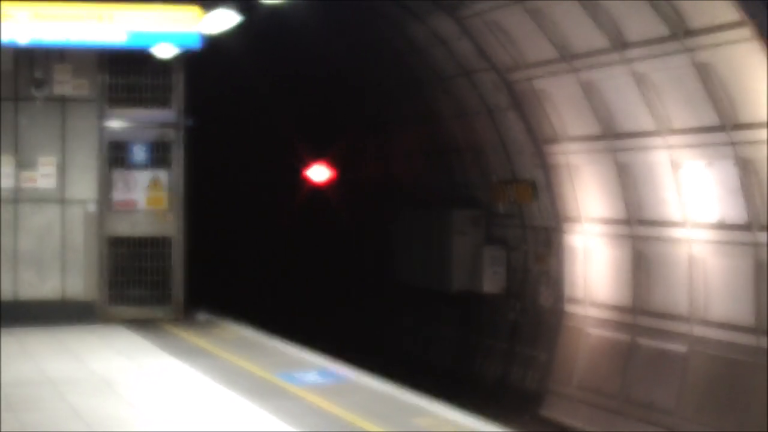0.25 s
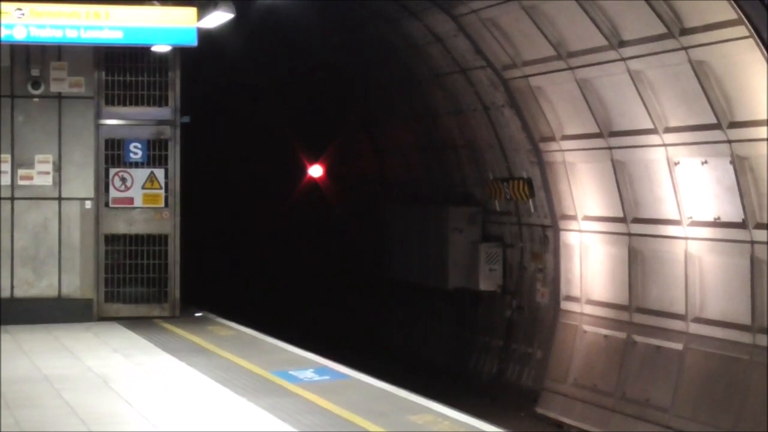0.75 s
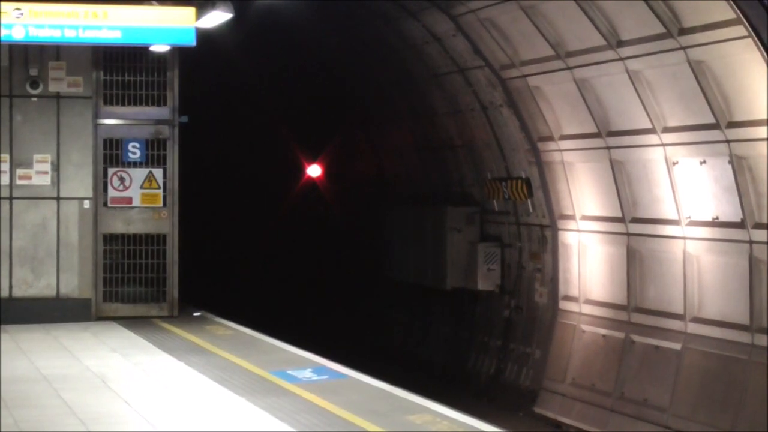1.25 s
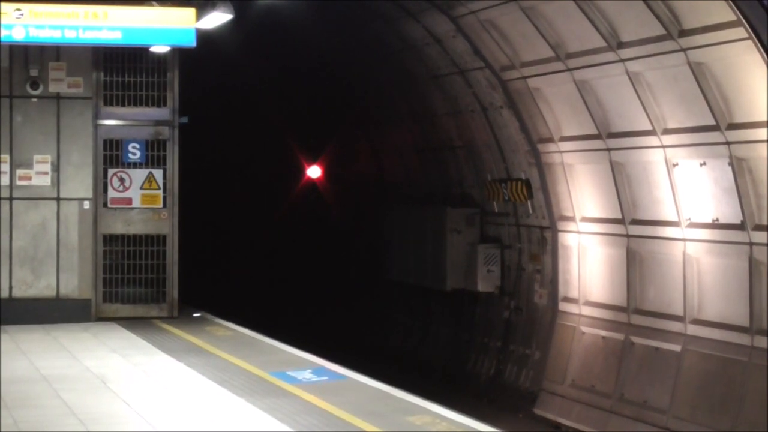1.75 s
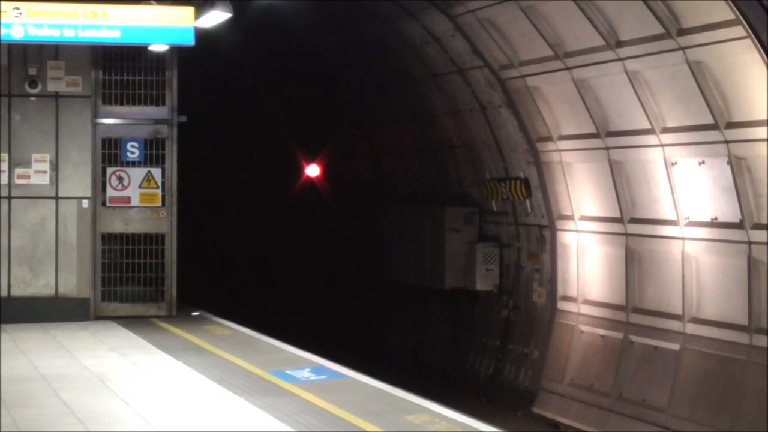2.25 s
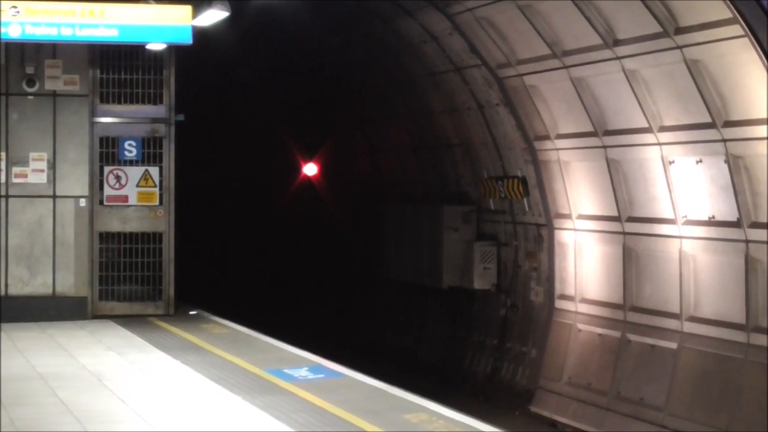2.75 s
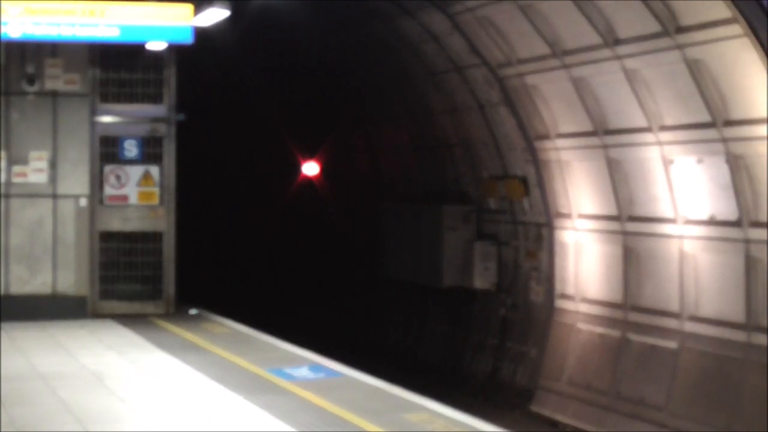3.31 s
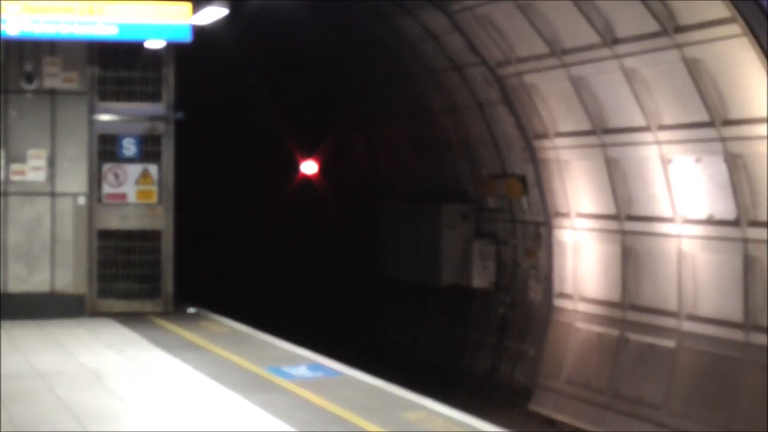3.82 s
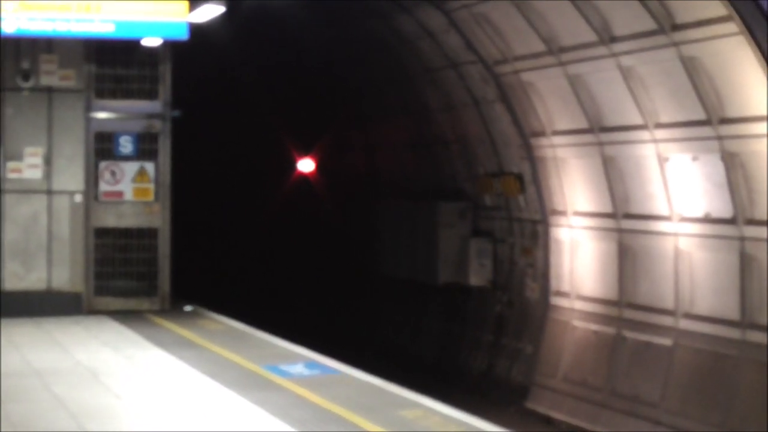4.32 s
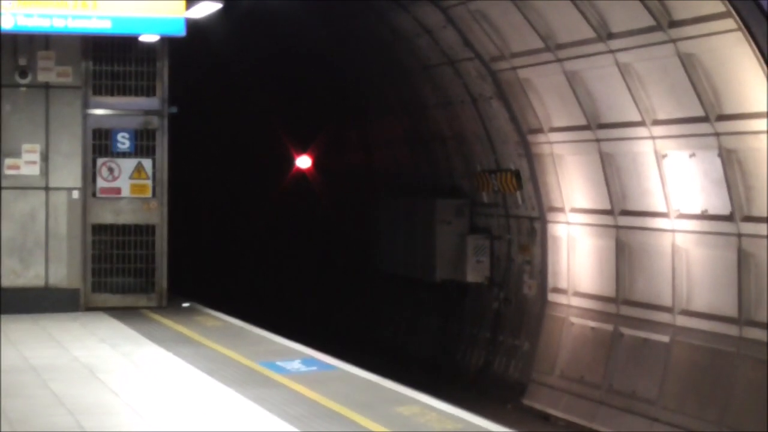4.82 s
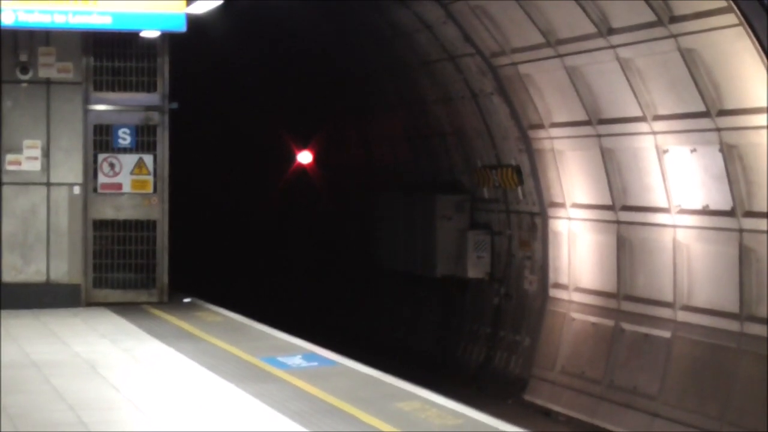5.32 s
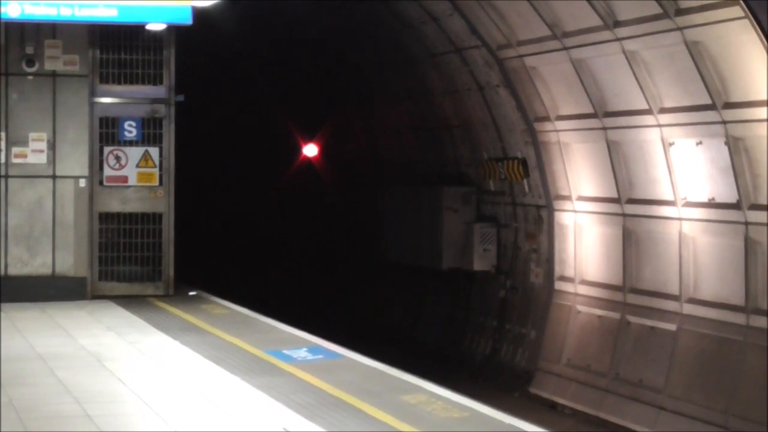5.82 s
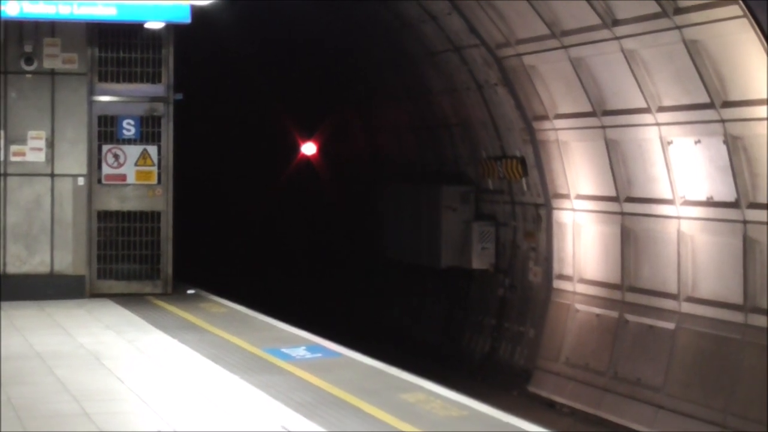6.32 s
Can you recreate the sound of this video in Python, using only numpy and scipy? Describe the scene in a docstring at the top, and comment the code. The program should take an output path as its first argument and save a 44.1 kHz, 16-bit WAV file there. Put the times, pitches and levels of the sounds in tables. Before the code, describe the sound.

Hollow tunnel drone with soft draught buffeting, brief irregular focus clicks at the start, and a fast, faint mechanical purr in the second half.

```python
"""An empty underground platform: a resonant tunnel rumble throughout, with a small camera's faint hiss and buzz.
At first the focus motor hunts in uneven ticks while draught thumps on the two microphone ports, mostly the right.
Thumps return before two seconds, then the draught eases. Near three seconds the motor starts creeping at fifty
ticks a second, and gusts crowd in again from about four. Shaped noise makes the air and hiss, wandering
oscillations the gusts, decaying body modes the ticks."""
import sys
import numpy as np
from scipy import signal
from scipy.io import wavfile
from scipy.ndimage import uniform_filter1d

SR = 44100
rng = np.random.default_rng(int(sys.argv[2]) if len(sys.argv) > 2 else 0)


def to_wav(sig):
    """Store sig (one row per channel, or 1-D mono) as 16-bit WAV at the path in sys.argv[1].

    Samples outside -1..1 are clipped; the rate is SR.
    """
    pcm = np.clip(np.atleast_2d(sig), -1, 1) * 32767
    pcm = np.round(pcm).astype(np.int16)
    wavfile.write(sys.argv[1], SR, pcm.T)  # frames by channels


N = 289296

# Broad tunnel colour. Each row: frequency in Hz, relative level in dB per Hz.
RUMBLE_COLOUR = [(30, -31), (100, -8.5), (190, -1.5), (260, 3.5), (320, -6), (600, -4.5), (900, -5.5),
                 (1000, -12), (1150, -31), (1340, -44), (1400, -27.5), (1800, -33), (1900, -43.5),
                 (2600, -61.5)]
# Tunnel resonances over that colour. Each row: centre in Hz, width in Hz, level in dB rms.
RESONANCES = [(209, 12, -42), (239, 47, -41.5), (364.2, 12, -39), (335.7, 13.5, -44.5), (630, 7.4, -41.5),
              (663.4, 29, -42.5), (716, 14, -53), (798, 5, -50.5), (837, 11.3, -44), (884, 34, -44.5),
              (970, 9.7, -53), (1113, 10, -76.5), (1430, 50, -65), (1572, 23, -65.5), (1607, 40, -67.5),
              (1760, 16, -70), (2016, 19, -77.5)]
RUMBLE_DB = -31.5  # rms of the broad colour, without the resonances
# Slow swell of the rumble, used about its mean. Each row: time in seconds, level in dB.
SWELL_CURVE = [(0, 1), (1, 1), (2, 1.37), (3.2, 2.17), (4.2, 1), (5.2, 1.95), (6.56, 1.04)]
# Left-right likeness of the rumble. Each row: frequency in Hz, correlation from -1 to 1.
RUMBLE_LIKENESS = [(100, 0.97), (350, 0.992), (700, 0.975), (1100, 0.96), (1500, 0.91), (2200, 0.94),
                   (3000, 0.94)]
# Wide wash of tunnel colour. Each row: time in seconds, level on the left port in dB rms.
RUSH_CURVE = [(0, -44), (.5, -41), (.85, -47), (1.1, -42.5), (1.6, -46), (2, -58), (2.6, -55), (3.1, -45),
              (3.4, -41), (3.75, -40), (4.1, -37), (4.3, -34.5), (4.6, -45.5), (5.1, -38), (5.4, -41.5),
              (5.9, -36), (6.1, -37.5), (6.56, -38.5)]

# Draught on each port, before crossfeed. Each row: time in seconds, left and right low flutter in dB rms.
DRAUGHT_CURVE = [(0.0, -73, -40), (0.22, -42, -49), (0.36, -36, -34), (0.48, -51, -44.5), (0.602, -34, -31),
                 (0.75, -46.5, -40), (1.1, -41, -40.5), (1.38, -39, -35), (1.56, -41, -38),
                 (1.95, -37.5, -38), (2.18, -55, -49), (2.6, -69, -56), (3.0, -47.5, -53), (3.5, -50, -44),
                 (4.0, -46.5, -48), (4.35, -39, -40.5), (4.75, -43.5, -40), (4.95, -45, -40.5),
                 (5.2, -47, -42), (5.5, -37.5, -36), (6.0, -44.5, -42), (6.48, -38.5, -37),
                 (6.56, -65, -40)]
# Draught colour. Each row: frequency in Hz, relative dB per Hz in calm air, dB gained per dB of draught.
FLUTTER_COLOUR = [(15, -50, 7), (47.8, -6, 0), (83, 3.5, 1), (135, 0.5, 2.5), (236, 0, 2), (290, -10.5, 2),
                  (477, -22.5, 4.5), (870, -17.5, 1.5), (1170, -56, 5.5), (1790, -65.5, 1.5)]
# Strong gusts, before filtering. Each row: crest in seconds, eddies in dB rms on the nearer port,
# left-right balance in dB, length in ms, eddy rate in Hz, fine scrape in dB rms.
STRONG_GUSTS = [(0.3316, -3.5, -13.5, 5.5, 212, -52), (0.3736, -12, -8, 12, 212, -41),
                (0.385, -28, -6, 13, 192, -36), (0.5841, -18, 13, 7.2, 200, -56),
                (0.5925, -16, -12, 7, 220, -50), (0.5992, -4.5, 14, 7.5, 200, -40),
                (0.6069, -9, 1.5, 6, 190, -45), (0.612, -4.2, -30, 4.9, 286, -35.5),
                (0.6208, -4, -25.5, 6.4, 170, -36.5), (0.6282, -11.5, -25, 12, 290, -39.5),
                (0.6915, -12, -16, 7.3, 216, -58), (0.6995, -17, -17, 11, 242, -59),
                (1.2614, -19, -17, 5.4, 197, -65), (1.2749, -13, -5.5, 8.1, 229, -56),
                (1.2996, -22, 0, 6.5, 200, -65), (1.3363, -10.5, 9, 12, 257, -67),
                (1.3532, -14, -12, 8.1, 247, -44), (1.3628, -14.5, -25, 13, 258, -49),
                (1.3926, -4.5, -10, 4.1, 190, -46), (1.408, -11.5, -21, 6.8, 237, -48),
                (1.4435, -10.5, -17, 4.7, 200, -48), (1.6505, -11, -23, 6.4, 169, -65),
                (1.6668, -4.5, -20, 3.9, 295, -54), (1.6768, -2, -16, 3, 295, -55),
                (1.6854, -16.5, -16, 20, 264, -58), (1.7029, -14.5, -6.5, 21, 282, -49),
                (1.7644, -18, -21, 8.5, 170, -65), (1.97, -17.5, -35, 19, 151, -65),
                (3.4324, -18.5, 35, 18, 237, -65), (3.573, -16, -9, 5.1, 173, -64),
                (4.213, -25, -12, 22, 130, -49), (4.3085, -14, -2, 11, 150, -57),
                (4.3155, -19, -13, 6.6, 210, -58), (4.33, -15, -20, 19, 164, -60),
                (4.3541, -8, -6, 6.5, 182, -50), (4.383, -23, -16, 18, 246, -52),
                (4.5033, -14, -32, 14.4, 192, -65), (4.5105, -15, -3.5, 16, 168, -65),
                (4.53, -21, 21, 17, 87.5, -65), (4.6036, -13, -29, 7.6, 133, -50),
                (4.9032, -7.5, -28, 4.2, 234, -65), (4.9113, -11, -25, 5.8, 250, -58),
                (4.9175, -18, -20, 6, 308, -58), (4.9396, -15.5, -15, 7.8, 172, -67),
                (4.9648, -10, -13, 5.4, 198, -60), (4.982, -10, -8, 8, 230, -56),
                (4.9924, -3, -14, 7.9, 169, -35), (4.9989, -4, -14, 3.5, 230, -30),
                (5.0075, -7, -7, 4.6, 241, -53), (5.0215, -18, -15, 6.3, 250, -50),
                (5.0264, -13, -22, 2.3, 272, -38), (5.0302, -13, -12, 3.3, 290, -47),
                (5.4978, -10, -8, 8.3, 229, -53), (5.6076, -16, -5, 6, 200, -65),
                (6.0828, -21, 14, 12, 207, -65), (6.3503, -15, -1.5, 7.4, 178, -51),
                (6.483, -11, -4, 10, 162, -58), (6.5001, -15.5, -12, 6.7, 170, -49),
                (6.5153, -17, -10, 14, 196, -63), (6.542, -17, 8.5, 21, 166, -64),
                (6.5522, -15, -18, 29, 180, -38)]
# Small gusts: the stronger the draught, the louder.
SMALL_PER_S = 9
SMALL_OVER_DB, SMALL_SPREAD_DB = 9, 5.5  # above the draught's low flutter
SMALL_PAN_DB, SMALL_PAN_SPREAD_DB = -15, 11  # left minus right
SMALL_MS, SMALL_HZ, SMALL_SCRAPE_DB = 20, 178.7, -61.5
# Low push of air: dB rms for a 0 dB gust of 20 ms, dB per dB of gust, dB per doubling of length.
PUSH_DB, PUSH_GROWTH, PUSH_PER_DOUBLING_DB = -14, 0.56, 7.5
# Dry ticks on strong gusts. Each row: time in seconds, peak on the right port in dB, width in ms.
CREST_TICKS = [(0.6107, -38, 0.23), (0.6245, -36, 0.44), (1.3615, -41, 0.31), (1.6768, -25, 0.33),
               (4.999, -23.5, 0.51)]

# Focus motor hunting. Each row: step time in seconds, then accents of low knock, ping and upper clatter in dB.
HUNT_STEPS = [(.04, 7, 0, 12), (.06, -7, 14, 0), (.08, 2, 3, 3), (.10, -3, 8, 3), (.14, 5, 5, 1),
              (.16, -4, 8, 6), (.18, -2, 6, 1), (.20, -4, 12, 4), (.24, 0, 4, 0), (.26, 4, -4, 5),
              (.28, 2, -4, 0), (.30, 1, -4, 3), (.32, 4, -4, 1), (.34, -2, 12, 5), (.36, -4, 4, 5),
              (.38, -8, -4, -9), (.40, -2, 5, 7), (.42, 2, 3, 2), (.44, -4, 9, 5), (.46, -5, 0, 1),
              (.48, -2, 10, 2), (.50, -3, -5, -3), (.54, 0, 0, -3), (.56, -7, -5, -6), (.62, -2, 3, 2.5),
              (.64, -1, -6, -2), (.66, 0, -4, -2), (.70, 1, 2, -1)]
# Focus motor creeping steadily. The row: first step in seconds, last step in seconds.
CREEP_SPAN = (2.94, 6.54)
STEP_S = .02  # motor clock period
HUNT_SPREAD_DB = 4  # scales the random unevenness of hunting steps
KNOCK_TOP_HZ, PING_TOP_HZ = 3200, 4300  # modes are knock, ping or clatter by frequency
# Hard and soft creeping steps alternate; their order swaps over once.
ALTERNATE_DB, SWAP_S, SWAP_TAKES_S = 0.8, 5.4, 0.34
# Camera body modes. Each row: frequency in Hz, strike level in dB before the soft onset, 60 dB decay in seconds,
# random spread in dB, left-right balance in dB, rebound delay in ms, rebound level in dB, left phase lead in radians.
BODY_MODES = [(2360, -44.5, 0.0077, 2.5, -3.5, 6.9, -10, 0.74), (3900, -65, 0.024, 4, -1, 3.1, -7.5, 1.5),
              (4820, -51.5, 0.0042, 0, -1, 2.7, 1.5, -1.9), (2640, -54.5, 0.0086, 2.5, 0.5, 1.64, -1, 0.4),
              (5230, -53, 0.0064, 0.6, 4, 3.5, -9, 2), (7100, -66, 0.0063, 8, -3, 3, -14, -1.5),
              (11000, -56.5, 0.0028, 2, -5, 3, -14, 0.5), (3760, -66, 0.0052, 4.5, 14.5, 1.426, 3, -1.5)]

# Hiss colour. Each row: frequency in Hz, relative level in dB per Hz, left-right balance in dB.
HISS_COLOUR = [(1480, 7, -5.5), (2900, -4, 0), (4700, -2.5, 1), (5930, -13.5, -2), (7470, -0.5, 1),
               (10100, 0.5, -1), (13900, 1.5, 6), (15200, -9, 12), (16000, 2.5, -4)]
HISS_DB = -61  # rms before the buzz and treble throb
# Left-right likeness of the hiss. Each row: frequency in Hz, correlation from -1 to 1.
HISS_LIKENESS = [(3000, 0.92), (3800, 0.58), (5500, 0.5), (6500, 0.1), (7900, -0.35), (10000, 0),
                 (13200, -0.3)]
EDGE_HZ = 15650  # top of the camera's band


def gain_of(db):
    """Turns dB into an amplitude factor."""
    return 10 ** (np.asarray(db) / 20)


def evened(x):
    """Scales a signal to rms 1."""
    return x / np.sqrt(np.mean(x ** 2) + 1e-20)


def read(points, hz, column=1):
    """Reads a table column at any frequency, interpolating on a log-frequency axis."""
    rows = np.transpose(points)
    return np.interp(np.log(hz + 1), np.log(rows[0] + 1), rows[column])


def grid(size):
    """Gives the frequencies, frame times and two complex noise fields of a short-time spectrum."""
    frames = 4 * N // size + 5
    a, b, c, d = rng.standard_normal((frames, size // 2 + 1, 4)).T
    hz = np.fft.rfftfreq(size, 1 / SR)
    frame_s = np.arange(frames) * size / 4 / SR
    return hz, frame_s, a + 1j * b, c + 1j * d


def sound_of(spectra, size):
    """Overlaps short-time spectra back into sound."""
    return signal.istft(spectra, nperseg=size, noverlap=3 * size // 4)[1][..., :N]


def filtered(x, order, hz, kind="low"):
    """Runs a Butterworth filter forward and back, so nothing shifts in time."""
    return signal.sosfiltfilt(signal.butter(order, hz, kind, fs=SR, output="sos"), x)


def hiss(throb_db=3.5, throb_from_hz=7000, spike_db=-57):
    """Circuit noise: its treble rises early in each motor-clock period, and a repeated slice of it buzzes."""
    size = 1024
    hz, _, a, b = grid(size)
    same = read(HISS_LIKENESS, hz)[:, None]
    tilt_db = read(HISS_COLOUR, hz, column=2) / 2
    colour = gain_of(read(HISS_COLOUR, hz) + [tilt_db, -tilt_db])[..., None]
    spectra = np.array([a, same * a + np.sqrt(1 - same ** 2) * b]) * colour
    noise = gain_of(HISS_DB) * evened(sound_of(spectra, size))

    period = round(STEP_S * SR)
    one_period = noise[:, SR:SR + period]
    noise = noise + .4 * np.tile(one_period, N // period + 1)[:, :N]

    treble = filtered(noise, 1, throb_from_hz, "high")
    since_clock = np.arange(N) % period
    busy = uniform_filter1d((since_clock < .55 * period) - .5, 40)
    throb = gain_of(throb_db * busy * np.array([[1], [.7]])) - 1

    # a short high spike marks the start of each period, stronger on the left
    u = since_clock / SR
    spike = gain_of(spike_db) * np.sin(2 * np.pi * 13200 * u) * np.exp(-u / 0.00043) * np.array([[1], [.5]])
    return noise + treble * throb + spike


def tunnel_power(hz):
    """Power of the tunnel in each frequency bin: a broad colour plus bell-shaped resonances."""
    power = gain_of(read(RUMBLE_COLOUR, hz)) ** 2
    power = power / power.sum() * gain_of(RUMBLE_DB) ** 2
    for centre_hz, width_hz, db in RESONANCES:
        peak = np.exp(-.5 * ((hz - centre_hz) / (width_hz / 2)) ** 2)
        power = power + peak / peak.sum() * gain_of(db) ** 2
    return power


def rumble(waver_db=-0.54):
    """Far trains and fans through the tunnel: coloured noise with narrow resonances, nearly mono."""
    size = 8192
    hz, frame_s, a, b = grid(size)
    power = tunnel_power(hz)
    same = np.clip(read(RUMBLE_LIKENESS, hz), -1, 1)[:, None]
    spectra = np.array([a, same * a + np.sqrt(1 - same ** 2) * b]) * np.sqrt(power)[:, None]

    # narrow patches wax and wane over a third of a second
    patches = rng.standard_normal((len(frame_s), len(hz))).T
    patches = uniform_filter1d(patches, size=7, axis=1)
    patches = uniform_filter1d(patches, size=8, axis=0)
    spectra *= gain_of(waver_db * evened(patches))

    s, swell_db = np.transpose(SWELL_CURVE)
    swell = gain_of(np.interp(np.arange(N) / SR, s, swell_db - swell_db.mean()))
    left_right = gain_of([[.3], [-.3]])
    return evened(sound_of(spectra, size)) * np.sqrt(power.sum()) * swell * left_right


def rush(from_hz=420, tilt_db=0.5, right_db=-9, right_tilt_db=3.5):
    """Tunnel-coloured noise, independent on each port and stronger on the left: it widens the rumble as it grows."""
    size = 4096
    hz, _, a, b = grid(size)
    octaves = np.log2((hz + 1) / 700)  # tilts are per octave about 700 Hz
    low_cut = 1 + (from_hz / (hz + 1)) ** 2
    colour = np.sqrt(tunnel_power(hz)) * gain_of(tilt_db * octaves) / low_cut
    right_colour = colour * gain_of(right_db + right_tilt_db * octaves)
    air = sound_of(np.array([a, b]) * np.array([colour, right_colour])[..., None], size)
    s, db = np.transpose(RUSH_CURVE)
    level = gain_of(np.interp(np.arange(N) / SR, s, db))
    return air / np.sqrt(np.mean(air[0] ** 2)) * level


def focus(lag_s=.0017, rise_cycles=2.2, rasp_db=-65, rasp_s=0.0034, whirr_db=-9, whirr_s=0.17,
          drift_rad=0.77, odd_rad=0.67, loose_rad=0.2):
    """Every motor step rings the camera body's modes, a little differently each time, and scrapes briefly."""
    hunt = np.array(HUNT_STEPS)
    hunts = len(hunt)
    mode_hz = np.transpose(BODY_MODES)[0]
    accent_column = 1 + np.searchsorted([KNOCK_TOP_HZ, PING_TOP_HZ], mode_hz)
    creep_s = np.arange(CREEP_SPAN[0], CREEP_SPAN[1] + STEP_S / 2, STEP_S)
    # steps follow the motor clock
    clock = np.round(np.concatenate([hunt[:, 0], creep_s]) / STEP_S)
    at = np.round((clock * STEP_S + lag_s) * SR).astype(int)

    accent_db = np.zeros((len(BODY_MODES), len(at)))
    uneven = rng.uniform(-0.61, 1, (hunts, len(BODY_MODES))).T
    accent_db[:, :hunts] = hunt[:, accent_column].T + HUNT_SPREAD_DB * uneven
    swap = np.tanh((creep_s - SWAP_S) / SWAP_TAKES_S)
    accent_db[:, hunts:] = ALTERNATE_DB * (-1) ** np.round(creep_s / STEP_S) * swap

    chance = np.clip(rng.standard_normal((len(at), len(BODY_MODES), 2)), -1.6, 1.6)
    # the ringing phase drifts from step to step, and odd steps are offset
    step_rad = drift_rad * np.cumsum(rng.standard_normal(len(at))) + odd_rad * (clock % 2)
    t, out = np.arange(1500) / SR, np.zeros((2, N))
    for k, mode in enumerate(BODY_MODES):
        hz, db, t60, spread_db, pan_db, rebound_ms, rebound_db, lead_rad = mode
        strength = gain_of(db + accent_db[k] + spread_db * chance[:, k, 0])
        strikes = np.zeros(N, complex)
        strikes[at] = strength * np.exp(1j * (loose_rad * chance[:, k, 1] + step_rad))
        strikes += gain_of(rebound_db) * np.roll(strikes, round(rebound_ms / 1000 * SR))
        onset = 1 - np.exp(-t * hz / rise_cycles)
        ring = gain_of(-60 * t / t60) * onset * np.exp(2j * np.pi * hz * t)
        ringing = signal.oaconvolve(strikes, ring)[:N]
        lead = np.exp([[.5j * lead_rad], [-.5j * lead_rad]])
        out += gain_of([[pan_db / 2], [-pan_db / 2]]) * (lead * ringing).real

    # a dry puff of noise on each step, with a fainter, longer whirr after it
    puffs = np.zeros(N)
    puffs[at] = gain_of(rasp_db + .5 * (accent_db[1] + accent_db[2]).clip(-6, 8))
    decay = np.exp(-t / rasp_s) + gain_of(whirr_db) * np.exp(-t / whirr_s)
    rasp = signal.oaconvolve(puffs, decay)[:N] * rng.standard_normal(N)
    rasp = signal.sosfilt(signal.butter(2, [2100, 6500], "band", fs=SR, output="sos"), rasp)
    return out + rasp * gain_of([[-1.], [1.]])


def draught(lumpy_db=1.0, crossfeed=0.096, calm_db=-42):
    """Separate turbulence on each port, changing colour as it grows; each feeds the other side inverted."""
    size = 2048
    hz, frame_s, a, b = grid(size)
    s, *port_db = np.transpose(DRAUGHT_CURVE)
    low = (hz > 25) & (hz < 110)  # the band whose level the curve sets
    colour = gain_of(read(FLUTTER_COLOUR, hz))
    growth = read(FLUTTER_COLOUR, hz, column=2)[:, None] - 1
    ports = []
    for noise, db in zip((a, b), port_db):
        level_db = np.interp(frame_s, s, db) + lumpy_db * rng.standard_normal(len(frame_s))
        growth_db = growth * (level_db - calm_db)
        low_rms = np.sqrt(np.mean(sound_of(noise * (colour * low)[:, None], size) ** 2))
        ports.append(sound_of(noise * colour[:, None] * gain_of(level_db + growth_db), size) / low_rms)
    return np.array(ports) - crossfeed * np.array(ports[::-1])


def small_gusts():
    """Lesser puffs in the same columns as the strong gusts, one at a random moment in each time slot."""
    slots = np.arange(round(SMALL_PER_S * N / SR))
    when, strength, side, length, rate = rng.standard_normal((len(slots), 5)).T
    s = np.clip((slots + .5 + .5 * np.tanh(when)) / SMALL_PER_S, 0, N / SR)
    curve_s, left_db, right_db = np.transpose(DRAUGHT_CURVE)
    draught_db = np.interp(s, curve_s, np.maximum(left_db, right_db))
    db = draught_db + SMALL_OVER_DB + SMALL_SPREAD_DB * np.tanh(strength)
    pan_db = SMALL_PAN_DB + SMALL_PAN_SPREAD_DB * side
    ms = SMALL_MS * np.exp(0.25 * length)
    hz = SMALL_HZ * np.exp(0.1 * rate)
    return list(zip(s, db, pan_db, ms, hz, np.full(len(s), SMALL_SCRAPE_DB)))


def gusts(wander=0.23, rough=0.17, attack=1.0, push_ms=30, push_hz=70, top_hz=750, low_hz=45):
    """Each gust sheds uneven eddies past one port over a slower push of air, inverted on the other side."""
    out, scrape = np.zeros((2, 2, N + SR))
    t = np.arange(-4096, 4096) / SR
    rows = STRONG_GUSTS + small_gusts()
    noise = rng.standard_normal((len(rows), 4, len(t)))
    start = rng.random(len(rows))
    rough_band = signal.butter(2, [90, 500], "band", fs=SR, output="sos")
    for (s, db, pan_db, ms, hz, scrape_db), (drift, sway, *puffs), turn in zip(rows, noise, start):
        sides = gain_of(np.minimum([[pan_db], [-pan_db]], 0))
        # eddy crests point up on the nearer port
        nearer = -np.sign(pan_db + .1) * np.array([[-1], [1]])

        rate = hz * (1 + wander * evened(uniform_filter1d(drift, 300)))
        turns = np.cumsum(rate) / SR
        phase = 2 * np.pi * (turns - turns[len(t) // 2])  # a crest falls on the gust's moment
        eddies = evened(np.cos(phase) + 0.16 * np.cos(2 * phase))
        roughness = evened(signal.sosfilt(rough_band, puffs))
        flutter = (1 - rough) * eddies * nearer + rough * roughness

        # quicker rise, slower fall
        spread = ms / 1000 / 2
        peak_s = spread / 3
        width = spread * np.where(t < peak_s, attack, 1.2)
        shape = np.exp(-.5 * ((t - peak_s) / width) ** 2)

        push_db = PUSH_DB + PUSH_GROWTH * db + PUSH_PER_DOUBLING_DB * np.log2(ms / 20)
        slow_rate = push_hz * (1 + 0.356 * evened(uniform_filter1d(sway, 700)))
        slow_phase = 2 * np.pi * (turn + np.cumsum(slow_rate) / SR)
        push_shape = np.exp(-.5 * (t / (push_ms / 2000)) ** 2)
        push = gain_of(push_db) * np.sqrt(2) * np.cos(slow_phase) * push_shape * nearer

        at = round(s * SR)
        out[:, at:at + len(t)] += sides * (gain_of(db) * flutter * shape + push)
        # finer turbulence rides on the crests of the eddies
        fine = shape * np.maximum(eddies, .2) * drift
        scrape[:, at:at + len(t)] += gain_of(scrape_db) * sides * nearer * fine

    out = filtered(out, 2, top_hz)
    out = filtered(out, 1, low_hz, "high")
    fine_band = signal.butter(4, [950, 1800], "band", fs=SR, output="sos")
    band_makeup = np.sqrt(SR / 2 / 900)  # restores the level lost to the narrow band
    out += band_makeup * signal.sosfilt(fine_band, scrape)
    return out[:, 4096:N + 4096]


def snaps(left=0.44):
    """The right port overloads for an instant: a small rounded cap is taken off, heard as a dry tick."""
    out, t = np.zeros(N), np.arange(N) / SR
    for s, db, ms in CREST_TICKS:
        out -= gain_of(db) * np.maximum(1 - ((t - s) / (ms / 2000)) ** 2, 0)
    return out * np.array([[left], [1]])


def scene():
    """Mixes tunnel, draught and camera."""
    return rumble() + draught() + gusts() + snaps() + focus() + hiss() + rush()


def record(dry):
    """Squeezes the loudest crests softly under full scale, then limits the band."""
    knee, room = .8, .19  # linear up to the knee, then bending into the room above it
    size = abs(dry)
    squeezed = knee + room * np.tanh((size - knee) / room)
    limited = np.sign(dry) * np.where(size > knee, squeezed, size)
    band_limit = signal.firwin(511, EDGE_HZ, window=("kaiser", 9), fs=SR)
    return signal.oaconvolve(limited, band_limit[None], "same")


dry = scene()
out = record(dry)
to_wav(out)
```